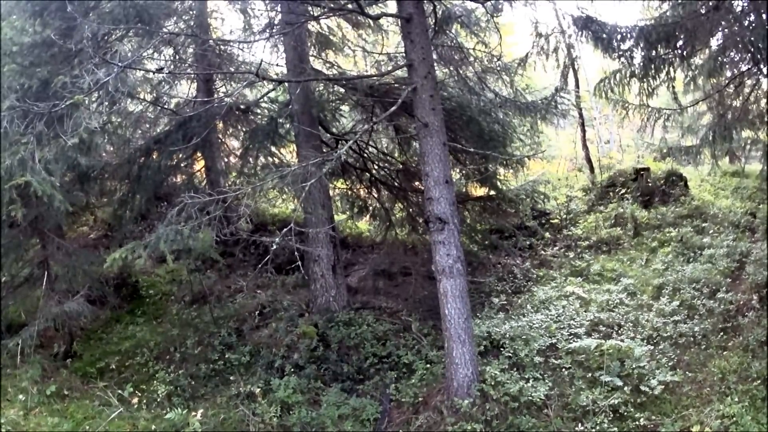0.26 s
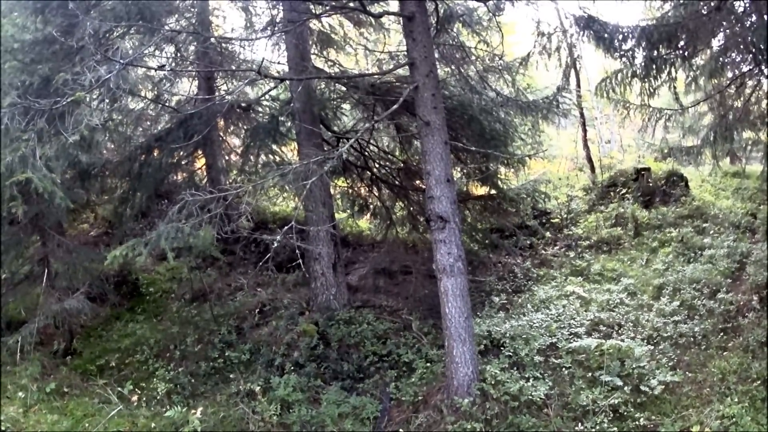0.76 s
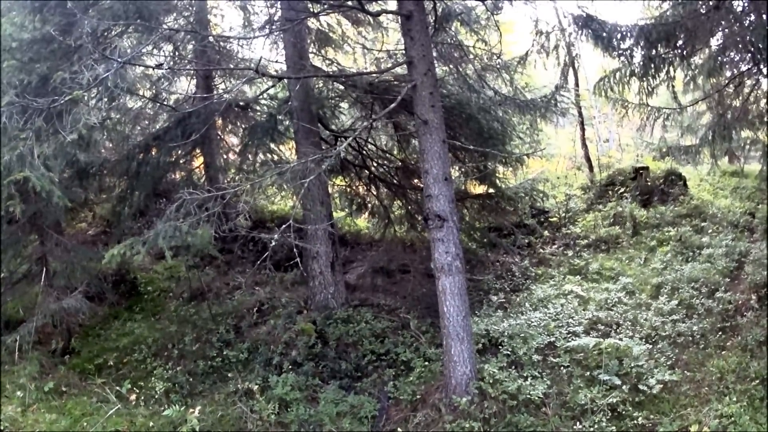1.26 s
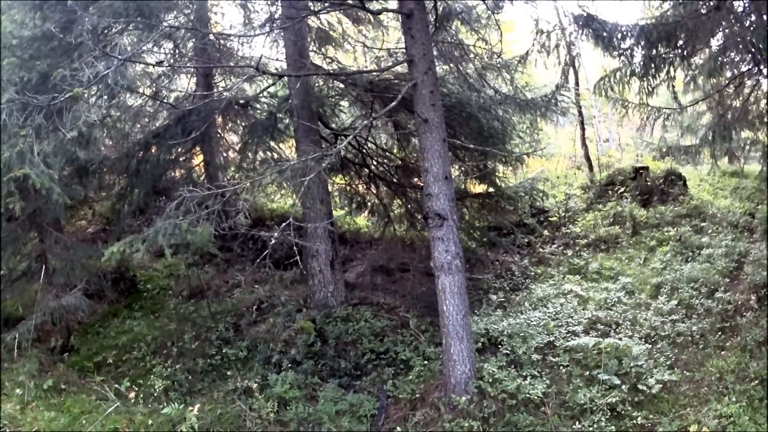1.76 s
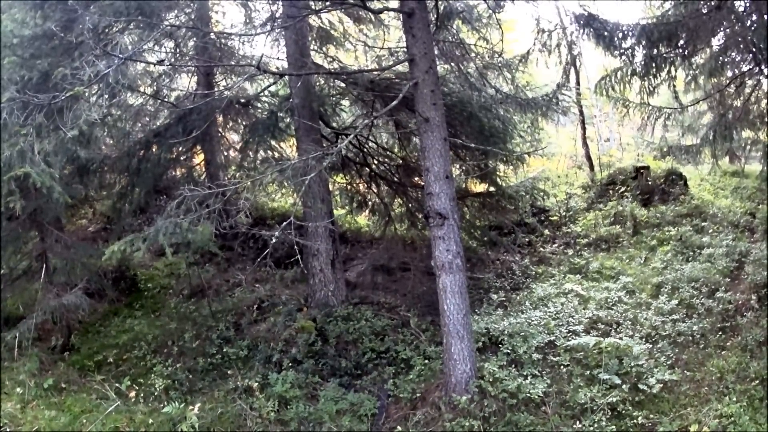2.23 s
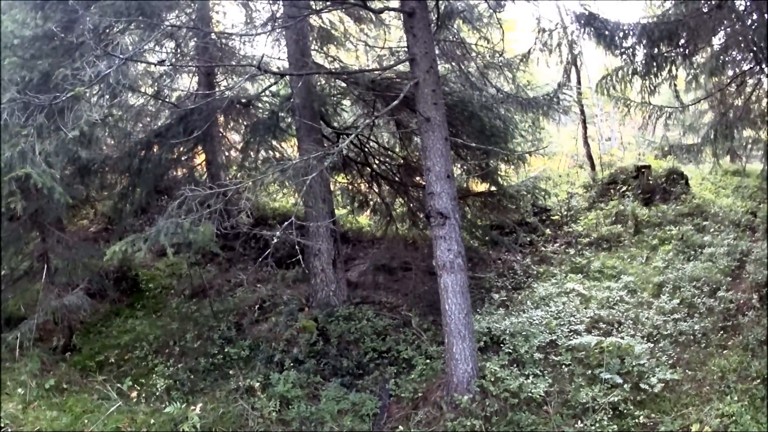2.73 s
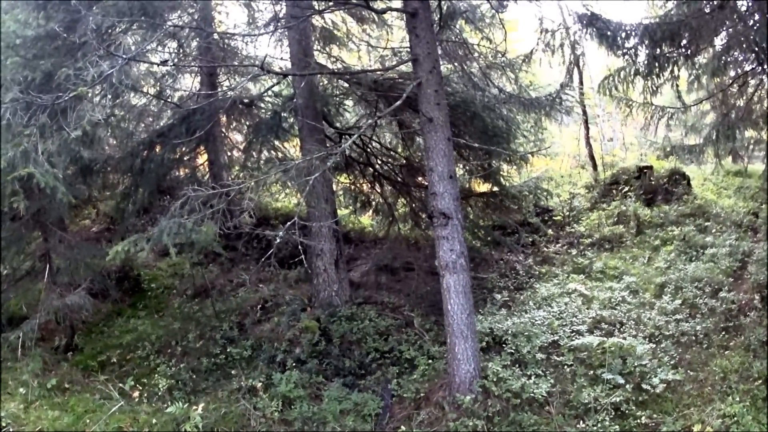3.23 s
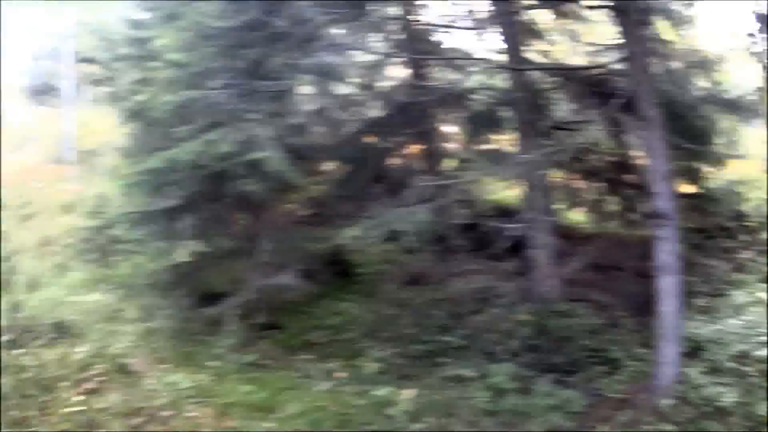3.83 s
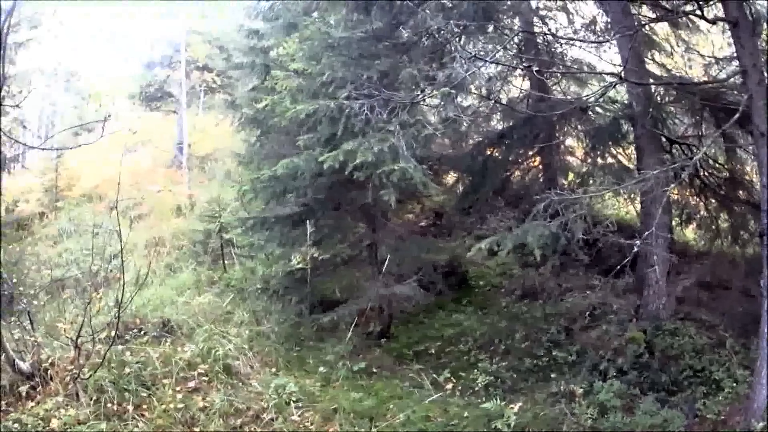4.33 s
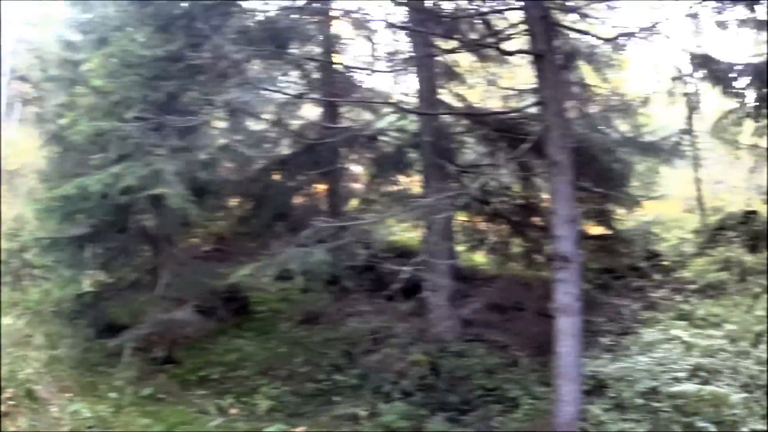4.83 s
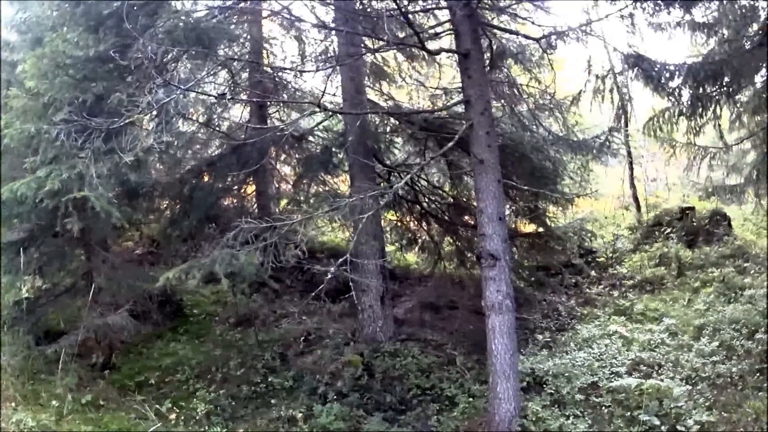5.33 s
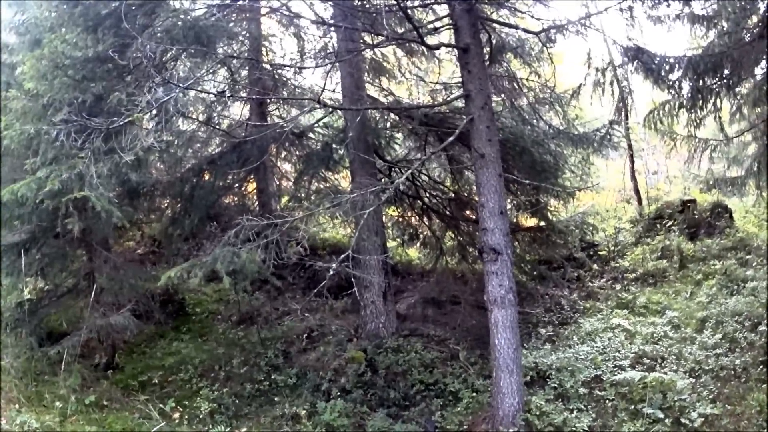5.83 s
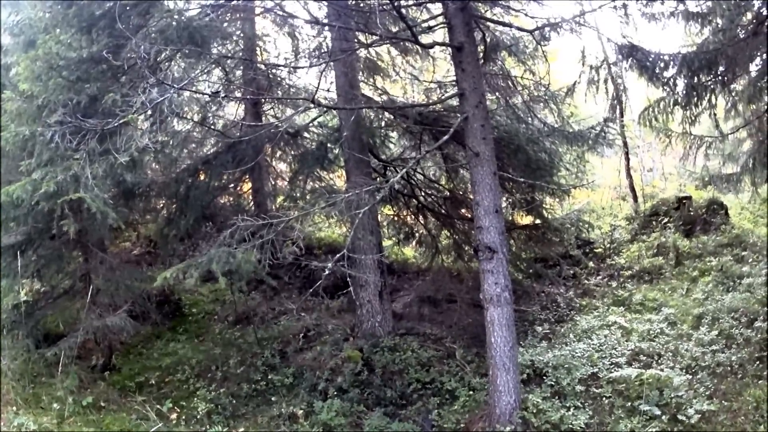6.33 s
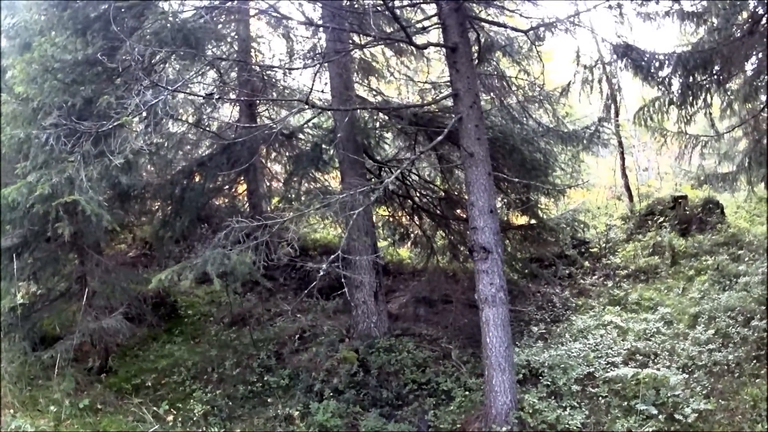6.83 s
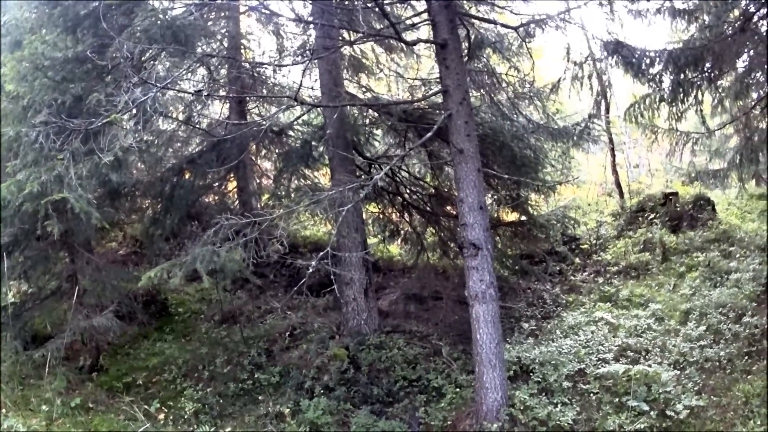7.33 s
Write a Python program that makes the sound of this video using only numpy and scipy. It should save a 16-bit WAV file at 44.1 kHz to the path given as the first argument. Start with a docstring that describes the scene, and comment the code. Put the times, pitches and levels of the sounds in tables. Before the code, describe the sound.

Outdoors in a spruce wood, hounds some way off give thin, high, almost whistling yelps, many dropping at the end, mixed with short hoarse barks. Each call leaves a long diffuse tail among the trunks. Faint and crowded at first, they become clearer and regularly spaced. Close by, twigs snap and brush rustles; a tiny bird chirps. The loudest yelp comes near six seconds, then only its echo and quiet hiss remain.

```python
"""Hounds give tongue some way off in a spruce wood: thin high yelps, many dropping at the end, and hoarse chest barks.
Yelps are near-sines with faint overtones; barks are uneven stacks of partials with puffs of breath noise.
The trunks scatter each call into a long tail, made from decaying noise. Near the microphone twigs snap as ringing
modes, brush rustles as grainy noise and a small bird chirps in gliding sines. Below lie hiss made of noise,
a low hum, the rumble of the hand and its bumps."""
import sys
import numpy as np
from scipy import signal
from scipy.fft import rfft, irfft, next_fast_len
from scipy.io import wavfile

SR = 44100
rng = np.random.default_rng(int(sys.argv[2]) if len(sys.argv) > 2 else 0)


def digitize_waveform(pressure):
    """Quantize a signal to 16-bit integers and store it at the path in sys.argv[1].

    Rows of a 2-D input are taken as channels; values are limited to [-1, 1].
    """
    field = np.atleast_2d(pressure).T
    bounded = np.clip(field, -1, 1)
    quanta = np.round(bounded * 32767).astype(np.int16)
    wavfile.write(sys.argv[1], SR, quanta)


N = 333837
LEAD = SR // 2   # samples of lead-in: calls just before the start still ring in the wood

# hiss and rumble over time: (time [s], hiss and air level [dB], handling rumble level before wavering [dB])
AIR_LEVELS = [(0, -55.5, -73.5), (3.2, -55.5, -75.5), (4.3, -54.5, -71.5), (5.1, -54, -72.5),
              (5.9, -55.5, -82), (6.6, -55, -74), (7.2, -58, -83), (7.57, -58.5, -70.5)]
# colour of the hiss: (frequency [Hz], relative level [dB])
HISS_COLOUR = [(11, -43), (18, -14), (54, -7.5), (120, -7), (224, -4.5), (900, -3.5), (1150, -6.5),
               (1410, -6.5), (13600, -18.5), (15900, -16.5)]
# how alike the hiss is left and right: (frequency [Hz], likeness [0-1])
HISS_LIKENESS = [(20, .97), (70, 0.85), (120, 0.17), (500, 0.033), (3000, 0.022), (8000, 0.36),
                 (13000, 0.82)]
# hum bands: (centre [Hz], level midway between the two sides [dB rms], width [Hz])
HUM_BANDS = [(59.8, -76, 5.5), (118, -83, 4.5)]

# bird chirps: (start [s], end [s], first pitch [Hz], last pitch [Hz], level [dB])
BIRD_CHIRPS = [(5.7, 5.705, 5060, 4820, -42.5), (5.715, 5.749, 4800, 5680, -59),
               (5.951, 5.961, 4750, 4810, -51.5), (6.28, 6.32, 4250, 5460, -61.5)]

# rustling brush: (start [s], end [s], level halfway [dB], centre [Hz], breadth [no unit])
BRUSH_RUSTLES = [(4.763, 4.914, -56.5, 3950, 1.9), (5.205, 5.317, -49, 1600, 2.3),
                 (5.538, 5.693, -51, 1800, 0.71), (5.568, 5.666, -59.5, 5000, 1.9),
                 (6.03, 6.127, -49, 2460, 1.6), (6.511, 6.619, -54, 1960, 0.16),
                 (6.399, 6.62, -65.5, 5000, 1.2)]
RUSTLE_FADE_DB = -8   # from start to end of a rustle

# what a dry twig rings with: (pitch before the snap's factor [Hz], relative level [dB], time to fall 60 dB [s])
TWIG_MODES = [(302, -13, 0.077), (670, -2.5, 0.034), (1267, 0.2, 0.028), (1740, -3, 0.014),
              (3180, 0.5, 0.0097), (5460, -4, .006)]
# twig snaps: (time [s], base level [dB], pitch factor [ratio], loudest region [Hz], reach [octaves])
TWIG_SNAPS = [(2.194, -31.5, 1.15, 785, 0.36), (5.227, -32, 0.95, 1810, 0.58), (5.272, -34, 1.1, 1690, 1.9),
              (5.543, -21.5, 1.06, 680, .4), (5.553, -29, 1.01, 302, .5), (6.42, -37, 1.01, 5550, .4),
              (6.447, -37, .83, 4550, 0.43)]
# the hand bumps the microphone body: (time [s], base level [dB])
HAND_BUMPS = [(3.55, -52), (5.239, -52), (6.084, -54)]
BUMP_HZ, BUMP_T60_S = 103.5, .18   # pitch, and time to fall 60 dB

# scattering among trunks: (band centre [Hz], early 60 dB fall [s], late 60 dB fall [s], late share [dB])
TRUNK_ECHOES = [(282, 0.045, 2.17, -6.5), (700, 0.19, 2.82, -12.5), (1200, 0.29, 2.82, -5.5),
                (2590, 0.23, 1.265, -3.5), (5000, 0.65, 0.52, -1)]
WOOD_DB, WOOD_BUILD_S = -6, 0.0083   # gain of the echoes, how gradually they build up
# left-right likeness of the echoes at 650 Hz; it fades with time, and with pitch by a power law
WOOD_LIKENESS, WOOD_SPREAD_S, WOOD_LIKENESS_FALL = 0.75, 0.8, 0.51

# chest barks: (start [s], length before the closing tail [s], first pulse rate [Hz], pulse rate it settles to [Hz],
#  base level [dB], roughness [0-1], chest boom [dB], top [dB], extra sent to the trees [dB])
CHEST_BARKS = [ (-.4, 0.054, 266.6, 268, -51.5, 0.25, 5, 3, 9.5),
               (.078, 0.067, 204.2, 208, -44.5, 0.54, -7.5, -1, 8.5),
               (.558, 0.065, 276.9, 280.8, -45, 0.42, 5, -5.5, 7.5),
               (2.962, 0.085, 205.2, 293.2, -32, 0.16, 1, -3.4, 1.9),
               (3.447, 0.089, 205.2, 214.6, -34.5, .31, 2, 2.4, 1.5),
               (4.308, 0.061, 213.1, 201.8, -30.5, .27, 7, 0, -3.5),
               (4.775, 0.046, 308.3, 329.6, -47.5, 0.36, 10.5, 8.7, 3),
               (6.072, 0.043, 216, 195, -39.5, 0.43, 7, 4, -7), ]
# colour the throat gives a bark: (frequency [Hz], gain [dB])
THROAT_COLOUR = [(250, -37.5), (400, -8.5), (600, 2), (850, 5), (1100, 3.5), (1400, -6.5), (1700, -3),
                 (2100, -11.5), (2600, -29.5), (4000, -33.5), (7000, -41)]
BARK_DIRECT_DB = -4   # barks are thrown away from the microphone, so more of them comes by way of the trees
RATE_SETTLE_S = .035   # the pulse rate moves early, then settles
BURST_DB, BURST_S, BARK_FADE_DB_PER_S = 10.5, 0.0059, -75   # a bark bursts out, then fades

# yelps, each onset - crest - end of the held note, then perhaps a drop:
# (start [s], crest after start [s], held [s], onset pitch [Hz], crest pitch [Hz], end pitch [Hz], drop [octaves],
#  onset level [dB], crest level [dB], end level [dB], level at the foot of the drop [dB],
#  octave partial at onset [dB], octave partial at end [dB], overtone base level [dB], extra sent to the trees [dB])
HIGH_YELPS = [ (-.4, .04, .07, 1200, 1248, 1200, 0.42, -57, -51, -42, -47, -12, -20, -36, 10),
              (.045, .013, 0.025, 1183, 1200, 1273, 0.0038, -42.5, -49.5, -33, -32, 1.5, -34, -34, 6),
              (.11, 0.049, 0.086, 1166, 1140, 1114, 0.055, -51, -45.5, -45, -28, -32, -39, -42, 7),
              (.527, 0.03, 0.076, 1207, 1171, 1114, 0, -46.5, -47, -56, -54, -11.5, -22, -28, 8),
              (.57, 0.053, .16, 561, 543.5, 507, 0, -54, -48, -59.5, -60, -16, -6, -32, 5.5),
              (.9, 0.21, 0.71, 527, 539.7, 522, 0, -62.5, -62, -76, -68, -10, -14, -28, 8.5),
              (1.02, 0.031, 0.072, 1138, 1144, 1194, 0.23, -46, -54.5, -52, -62, -9.5, -28, -28, 10.5),
              (1.165, 0.017, 0.039, 1240, 1250, 1280, 0.16, -48, -55.5, -64, -68, -23, -22, -23, 2.5),
              (1.46, 0.0796, .137, 1136, 1145, 1062, 0.62, -44, -49.5, -45.5, -58, -3, -14.5, -24.5, 6.5),
              (1.52, 0.037, 0.057, 1269, 1272, 1179, 0.047, -41.5, -46.5, -36.5, -35, -33, -32, -35, 2),
              (1.93, .03, 0.098, 1137, 1088, 1103, 0, -46, -50, -58, -46, -18, -17, -21.5, 5.5),
              (1.97, .035, 0.066, 537.5, 532.5, 532, 0, -55, -60, -58, -66, 15, -13, -7, 4),
              (1.985, 0.031, .065, 1242, 1277, 1239, 0.11, -29.5, -59.5, -43, -31, -34, -33, -32, 3),
              (2.425, 0.054, 0.13, 1181, 1011, 929, 0.045, -39, -56, -46, -63, -31, -10, -22, 7),
              (2.926, 0.02, .07, 1179, 1173, 1176, 0.17, -30.5, -30, -58.5, -54, -33, 5, -30, 0.7),
              (3.41, 0.0162, 0.042, 1165, 1193, 1260, 0, -38, -34.5, -38, -22, -3.5, -26, -33, 3),
              (3.887, 0.049, .115, 1091, 1018, 1039, 0.65, -32.5, -41.5, -38, -39, -12, -10.5, -36, 8.5),
              (4.248, 0.031, .113, 1136, 1107, 1062, 0.7, -34.5, -32.5, -41, -27.5, -15.5, -7.5, -28, 3.5),
              (4.715, 0.033, .113, 1174, 1116, 1064, 0.66, -30.5, -35.5, -36, -37, -7.5, -12, -26.5, 4.5),
              (4.762, 0.02, 0.04, 1245, 1298, 1237, 0.48, -26, -51.5, -49, -43, -29, -27, -34, 5),
              (5.976, 0.0094, 0.01, 758, 784, 796, 0.05, -49, -36, -38, -45, -37, -33, -28, 2.5),
              (5.984, .046, .07, 1065, 1200, 1075, .58, -33.5, -21, -30, -30, -2, -0.9, -25.5, -3.5), ]
DROP_OCTAVES_PER_S, DROP_EASE = 33.84, 1.092   # average speed of the final drop, how gently it sets in
DROP_WAVER = 0.041   # extra pitch waver, as a share of the pitch, at the foot of the drop
SCOOP, SWELL = 0.61, 1.24   # bend of the way to the crest: pitch slides early, level swells late
OVERTONE_FALL_DB, FALL_FOLLOWS = 6, 0.24   # fall per partial at base level -24 dB; a higher base falls faster
OVERTONE_FADE_DB_PER_S = -56   # the upper partials are brightest at the onset
EVEN_FOLLOWS = 0.21   # how much the even partials follow the octave
RING_HZ, RING_WIDTH_HZ, RING_DB = 5700, 440, 7.5   # a high resonance of the mouth

# the microphone swings about: (time [s], left minus right [dB])
MIC_BEARING = [(0, -2), (1.2, -4), (3.4, -2.5), (3.8, -4.5), (5, -4), (6.1, -5), (6.35, -1), (7.57, -3)]
CUTOFF_HZ = 16050   # nearly nothing is left above this


def amp(db):
    """Turn decibels into gain."""
    return 10 ** (np.asarray(db) / 20)


def rms_one(x):
    """Scale to an average strength (rms) of 1."""
    return x / np.sqrt(np.mean(x ** 2) + 1e-20)


def at_hz(points, hz, column=1):
    """Read a table between its points, along a log-frequency axis."""
    points = np.array(points)
    return np.interp(np.log(np.maximum(hz, 1)), np.log(points[:, 0]), points[:, column])


def span(t0, t1, fade_s):
    """Give one event's sample places (counted from the lead-in), times and soft-edged gate."""
    t = np.arange(int(t0 * SR), int(t1 * SR)) / SR
    places = np.arange(len(t)) + int(t0 * SR) + LEAD
    gate = np.clip(np.minimum(t - t0, t1 - t) / fade_s, 0, 1) ** 2
    return places, t, gate


def wobble(size, rate_hz):
    """Make smooth random wandering of rms 1 by low-passing noise twice."""
    r = np.exp(-2 * np.pi * rate_hz / SR)
    noise = rng.standard_normal(size + 2000)
    return rms_one(signal.lfilter([1], [1, -2 * r, r * r], noise)[2000:])


def shaped(x, gain):
    """Filter by a gain given as a function of Hz."""
    size = next_fast_len(x.shape[-1])
    spectrum = rfft(x, size) * gain(np.fft.rfftfreq(size, 1 / SR))
    return irfft(spectrum, size)[..., :x.shape[-1]]


def floor():
    """Hiss and far air that swell a little, rumble of the hand on the body, narrow wavering hum bands."""
    s, air_db, rumble_db = np.transpose(AIR_LEVELS)
    t = np.arange(N) / SR
    mid, side, grip = rng.standard_normal((3, N))

    def likeness(f):
        return np.clip(at_hz(HISS_LIKENESS, f), 0, 1)

    mid = shaped(mid, lambda f: amp(at_hz(HISS_COLOUR, f)) * np.sqrt(1 + likeness(f)))
    side = shaped(side, lambda f: amp(at_hz(HISS_COLOUR, f)) * np.sqrt(1 - likeness(f)))
    out = amp(np.interp(t, s, air_db)) * rms_one(mid + side * [[1], [-1]])

    grip = shaped(grip, lambda f: np.exp(-np.log((f + 1) / 100) ** 2 / 0.67))
    out = out + amp(np.interp(t, s, rumble_db) + 3.7 * wobble(N, 6.3)) * rms_one(grip)

    for hz, level_db, width_hz in HUM_BANDS:
        band = shaped(rng.standard_normal(N), lambda f: np.exp(-((f - hz) / width_hz) ** 2))
        out = out + amp(level_db) * rms_one(band) * amp([[-.7], [.7]])   # a little louder on the right
    return out


def bird():
    """A small bird's short whistles: sines whose pitch glides slowly at first, then faster."""
    out = np.zeros(LEAD + N)
    for t0, t1, first_hz, last_hz, level_db in BIRD_CHIRPS:
        places, t, gate = span(t0, t1, 0.005)
        hz = first_hz + (last_hz - first_hz) * np.linspace(0, 1, len(t)) ** 1.56
        out[places] += gate * amp(level_db) * np.sin(2 * np.pi * np.cumsum(hz) / SR)
    return out


def rustles():
    """Dense uneven leaf grains: flickering noise in a broad hump of pitch, partly unlike left and right."""
    out = np.zeros((2, LEAD + N))
    for t0, t1, level_db, hz, breadth in BRUSH_RUSTLES:
        places, t, gate = span(t0, t1, 0.031)
        grains = rng.standard_normal((3, len(t))) * amp(2.7 * wobble(len(t), 170))
        grains = grains[0] + 3.1 * grains[1:]   # one shared part, one part for each side
        hump = shaped(grains, lambda f: 1 / (1 + (f / hz - hz / (f + 1)) ** 2 / breadth) ** 1.34)
        fade_db = RUSTLE_FADE_DB * np.linspace(-.5, .5, len(t))
        out[:, places] += gate * amp(level_db + fade_db) * rms_one(hump)
    return out


def ring(s, peak_db, hz, t60, attack_cycles):
    """One mode struck at s: sample places and the dying sine."""
    places, t, gate = span(s, s + 0.52, attack_cycles / hz)
    return places, gate * amp(peak_db - 60 * (t - s) / t60) * np.sin(2 * np.pi * hz * (t - s))


def knocks():
    """Each snap rings the twig's modes, those near its loudest region most; each bump rings the body's low mode."""
    out = np.zeros(LEAD + N)
    for s, peak_db, factor, region_hz, reach in TWIG_SNAPS:
        for mode_hz, mode_db, t60 in TWIG_MODES:
            hz = mode_hz * factor
            # soft contacts ring a narrow region and start more gently
            away_db = -6 * (np.log2(hz / region_hz) / reach) ** 2
            places, x = ring(s, peak_db + mode_db + away_db, hz, t60, 1.5 / reach)
            out[places] += x
    for s, peak_db in HAND_BUMPS:
        places, x = ring(s, peak_db, BUMP_HZ, BUMP_T60_S, 1.2)
        out[places] += x
    return out


def wood(spots):
    """Echoes off countless trunks: noise in bands that builds up, dies fast, then slowly; each spot has its own."""
    t = np.arange(2 * SR) / SR
    mid, side = rng.standard_normal((2, len(spots), len(t)))
    centres, reply = np.array(TRUNK_ECHOES)[:, 0], 0
    for k, (hz, early_s, late_s, late_db) in enumerate(TRUNK_ECHOES):
        alike = np.clip(WOOD_LIKENESS * (hz / 650) ** -WOOD_LIKENESS_FALL, 0, 1) * np.exp(-t / WOOD_SPREAD_S)
        pair = np.sqrt(1 + alike) * mid + np.sqrt(1 - alike) * side * [[[1]], [[-1]]]
        only_this_band = np.c_[centres, np.arange(len(TRUNK_ECHOES)) == k]
        band = shaped(pair, lambda f: at_hz(only_this_band, f))
        reply = reply + band * (amp(-60 * t / early_s) + amp(late_db - 60 * t / late_s))
    reply = reply * (1 - np.exp(-t / WOOD_BUILD_S)) * np.sqrt(20 / SR)
    echoes = signal.fftconvolve(spots[None], reply, axes=2)[..., :LEAD + N]
    return amp(WOOD_DB) * echoes.sum(axis=1)


def barks():
    """Slack folds beat unevenly: wavering partials, breath noise puffing with each beat, coloured by the throat."""
    direct, spots = np.zeros(LEAD + N), np.zeros((3, LEAD + N))
    for n, bark in enumerate(CHEST_BARKS):
        t0, length_s, first_hz, last_hz, level_db, rough, boom_db, top_db, scattered_db = bark
        places, t, gate = span(t0, t0 + length_s + 0.022, 0.0061)
        size = len(t)
        rough = np.clip(rough, 0, 1)

        rate_hz = last_hz + (first_hz - last_hz) * np.exp(-((t - t0) / RATE_SETTLE_S) ** 2)
        turns = np.cumsum(rate_hz * (1 + 0.1228 * rough * wobble(size, 57.8))) / SR
        stack = np.zeros(size)
        for k in range(1, 30):
            flicker = amp(8.3 * rough * wobble(size, 82))
            stack += flicker * np.sin(2 * np.pi * (k * turns + rng.random()))
        puffs = np.exp(-2.5 * (turns % 1)) * rng.standard_normal(size)
        source = np.sqrt(1 - rough ** 2) * rms_one(stack) + 2 * rough * rms_one(puffs)

        voiced = rms_one(shaped(source, lambda f: amp(at_hz(THROAT_COLOUR, f))))
        voiced += (amp(boom_db) - 1) * shaped(voiced, lambda f: 1 / (1 + (f / 540) ** 8))
        top = shaped(voiced, lambda f: 1 - 1 / (1 + (f / 1250) ** 6))
        jaws_open = 1 - np.exp(-(t - t0) / 0.0096)   # the top comes as the jaws open
        voiced -= (1 - amp(top_db) * jaws_open) * top

        burst_db = BURST_DB * np.exp(-(t - t0) / BURST_S)
        fade_db = BARK_FADE_DB_PER_S * (t - t0 - length_s / 2)
        call = gate * amp(level_db + burst_db + fade_db) * voiced
        direct[places] += amp(BARK_DIRECT_DB) * call
        spots[n % 3, places] += amp(scattered_db) * call   # calls take turns among three spots
    return direct, spots


def yelps():
    """Taut folds swing almost as a sine; faint breathy overtones flicker. Gives direct sound and three tree feeds."""
    direct, spots = np.zeros(LEAD + N), np.zeros((3, LEAD + N))
    for n, yelp in enumerate(HIGH_YELPS):
        t0, crest_s, held_s, *hz, octaves, onset_db, crest_db, end_db, foot_db = yelp[:11]
        first_octave_db, last_octave_db, third_db, scattered_db = yelp[11:]
        drop_s = max(octaves, 0) / DROP_OCTAVES_PER_S
        places, t, gate = span(t0, t0 + held_s + drop_s + 0.004, 0.0036)
        size = len(t)

        # times of onset, crest and end of the held note, then how far the drop has come (0-1)
        s = t0 + np.array([0, min(crest_s, held_s), held_s])
        dropped = np.clip((t - s[-1]) / (drop_s + 1e-9), 0, 1) * (octaves > 0)
        to_crest = (t - t[0]) / (s[1] - t0)
        slide = np.where(t < s[1], t0 + (s[1] - t0) * to_crest ** SCOOP, t)
        swell = np.where(t < s[1], t0 + (s[1] - t0) * to_crest ** SWELL, t)

        drop = np.sin(np.pi / 2 * dropped ** DROP_EASE) ** 2
        pitch = np.interp(slide, s, hz) * 2 ** (-octaves * drop)
        waver = (0.006 + DROP_WAVER * dropped) * wobble(size, 45.5)
        phase = 2 * np.pi * np.cumsum(pitch * (1 + waver)) / SR
        level_db = np.interp(swell, s, [onset_db, crest_db, end_db]) + (foot_db - end_db) * dropped
        octave_db = np.interp(t, s[::2], [first_octave_db, last_octave_db])
        closing_db = -110 * np.clip(.86 - pitch / max(hz), 0, 1)   # the mouth shuts as the pitch drops
        gate = gate * amp(9.1 * held_s * wobble(size, 25.0))   # long notes waver more

        tone = np.sin(phase) - amp(octave_db + closing_db) * np.cos(2 * phase)   # crests sharper than troughs
        fall_db = max(OVERTONE_FALL_DB + FALL_FOLLOWS * (third_db + 24), 0)
        fade_db = OVERTONE_FADE_DB_PER_S * (t - t0 - 0.025)
        for k in range(3, 8):
            partial_db = third_db - (k - 2.5) * fall_db + closing_db + fade_db
            if k % 2 == 0:
                partial_db = partial_db + EVEN_FOLLOWS * (octave_db + 15)
            partial_db = partial_db + RING_DB * np.exp(-((k * pitch - RING_HZ) / RING_WIDTH_HZ) ** 2)
            flicker_db = 4.8 * wobble(size, 44)
            breathy_phase = k * phase + 0.32 * wobble(size, 140)
            tone += amp(partial_db + flicker_db) * np.sin(breathy_phase)

        call = np.sqrt(2) * gate * amp(level_db) * tone
        direct[places] += call
        spots[n % 3, places] += amp(scattered_db) * call   # calls take turns among three spots
    return direct, spots


def scene():
    """Hounds to the right, direct and scattered; small sounds close by; the floor below."""
    s, left_db = np.transpose(MIC_BEARING)
    pan = amp(np.interp(np.arange(N) / SR, s, left_db) / 2 * [[1], [-1]])
    high, high_spots = yelps()
    low, low_spots = barks()
    calls = high + low
    direct = np.array([np.roll(calls, 1), calls])   # the far (left) ear hears it a sample late
    hounds = direct + wood(high_spots + low_spots)
    close_by = knocks() + rustles() + bird()
    return pan * hounds[:, LEAD:] + close_by[:, LEAD:] + floor()


def record(dry):
    """Cut the top steeply with a low-pass filter."""
    return signal.sosfilt(signal.cheby2(20, 80, CUTOFF_HZ, fs=SR, output="sos"), dry)


dry = scene()
out = record(dry)
digitize_waveform(out)
```